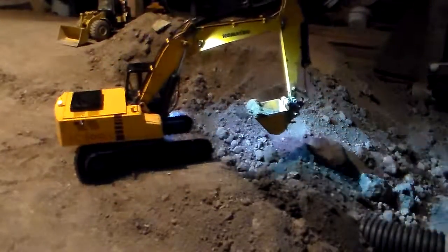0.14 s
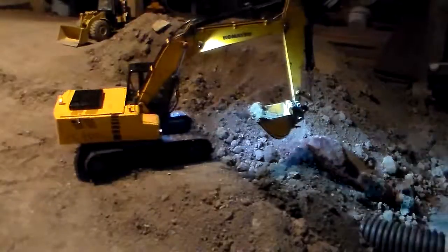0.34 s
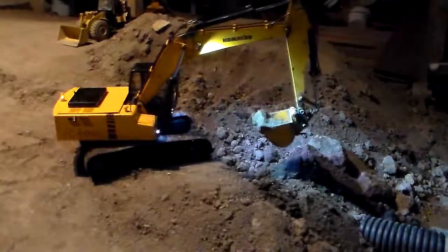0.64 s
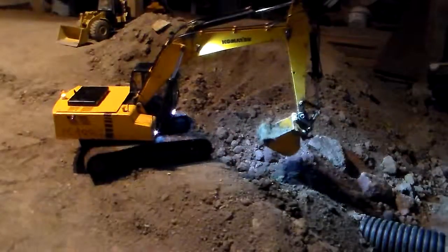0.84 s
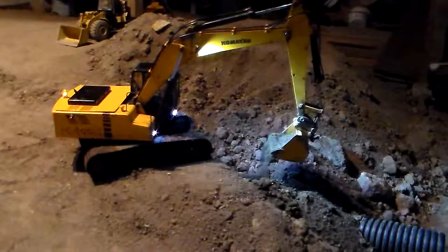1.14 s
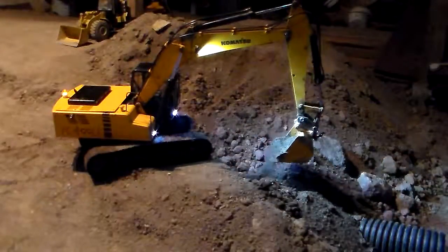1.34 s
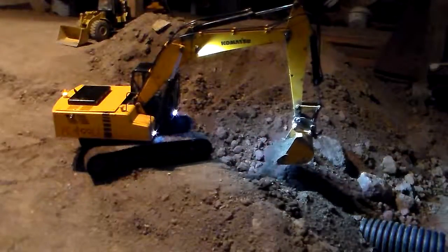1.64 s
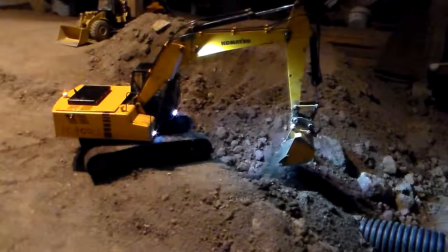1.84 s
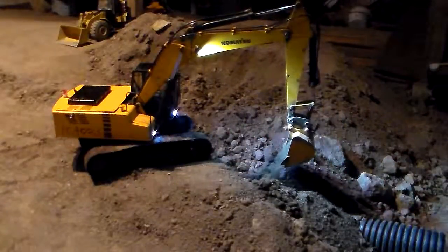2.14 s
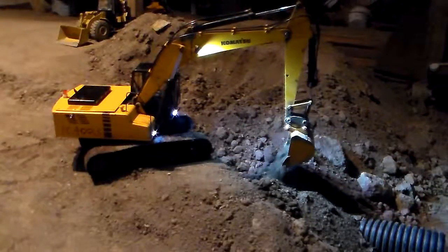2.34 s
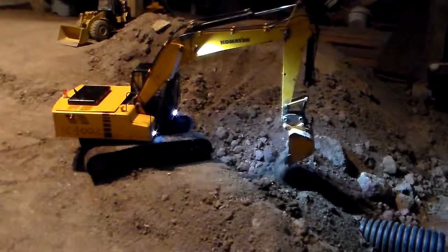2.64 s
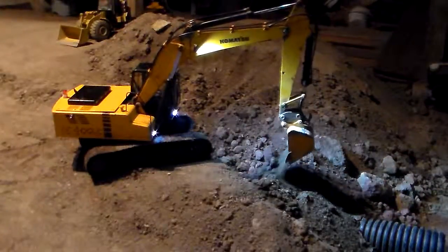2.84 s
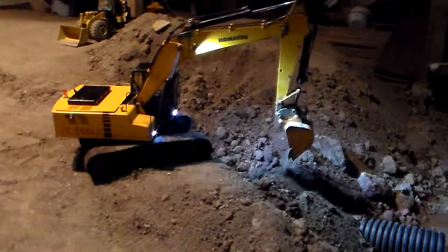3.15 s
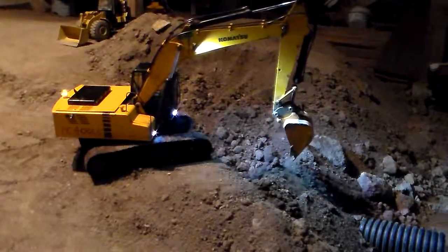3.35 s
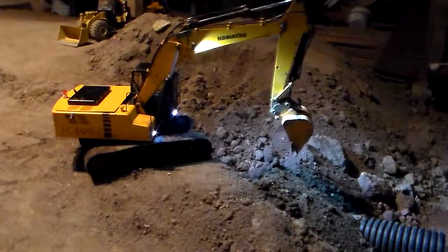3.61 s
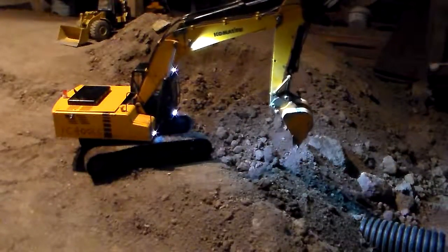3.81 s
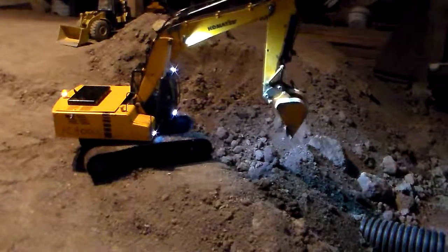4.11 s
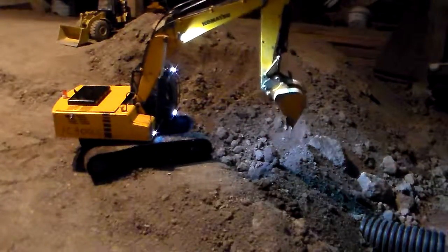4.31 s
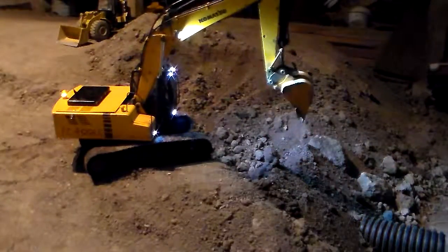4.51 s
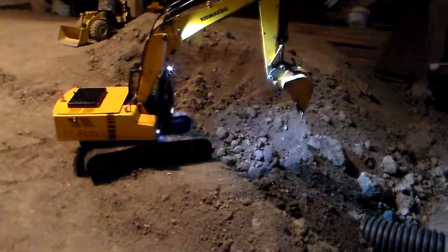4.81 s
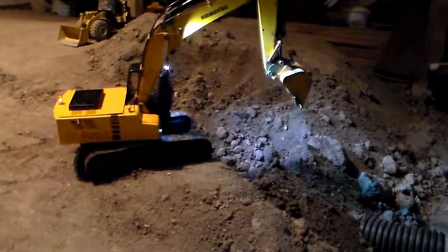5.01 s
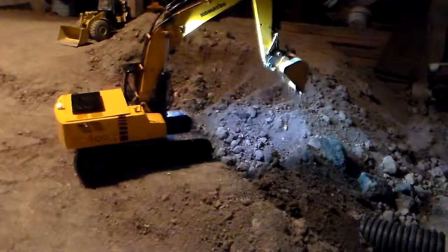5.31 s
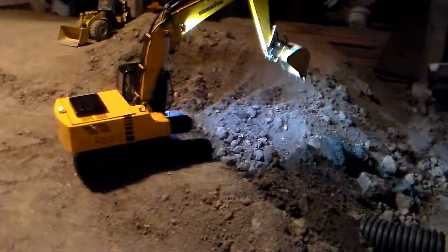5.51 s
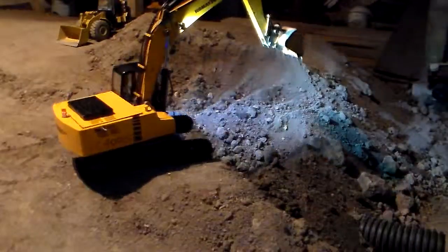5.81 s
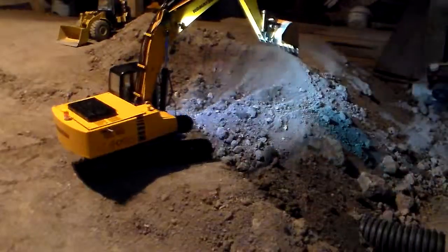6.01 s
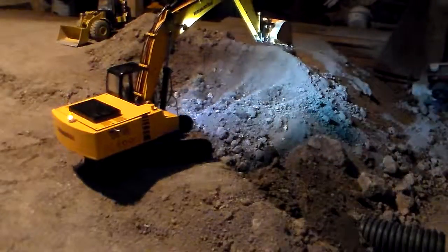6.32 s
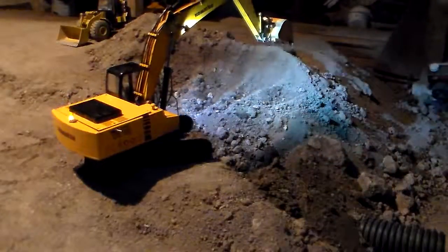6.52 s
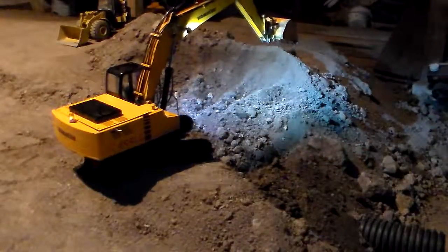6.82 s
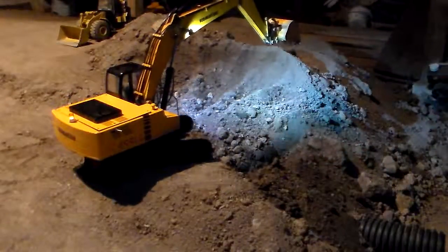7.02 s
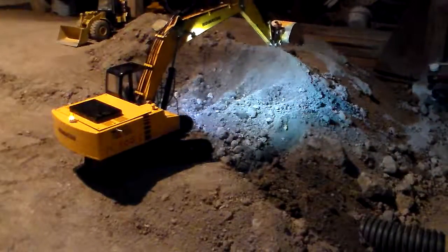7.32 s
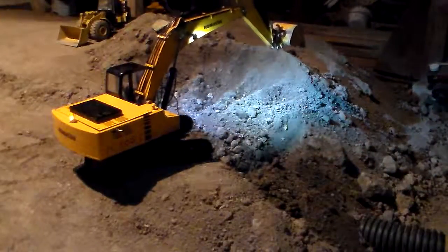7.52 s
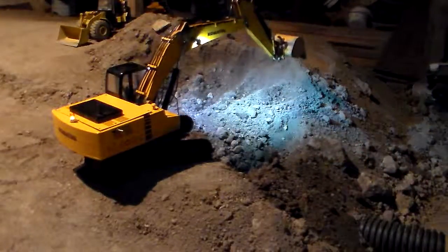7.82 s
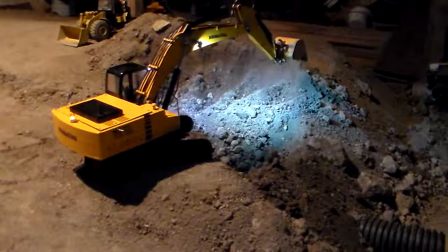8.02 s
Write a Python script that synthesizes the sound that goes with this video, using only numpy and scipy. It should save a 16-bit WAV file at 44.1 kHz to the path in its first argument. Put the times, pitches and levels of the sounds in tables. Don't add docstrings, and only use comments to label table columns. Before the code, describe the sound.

Steady shrill motor and gear whine of a model digger, close up, with slewing whirr, a single pebble click and brief whistling oil hisses.

```python
import sys
import numpy as np
from scipy import signal
from scipy.io import wavfile
from scipy.ndimage import uniform_filter1d

SR = 44100
rng = np.random.default_rng(int(sys.argv[2]) if len(sys.argv) > 2 else 0)


def inscribe(sig):
    pcm = np.round(np.clip(np.atleast_2d(sig).T, -1, 1) * 32767)
    wavfile.write(sys.argv[1], SR, pcm.astype(np.int16))


def volts_from_db(level):
    exponent = np.asarray(level, float) / 20
    return 10 ** exponent


N = 359415
T = np.arange(N) / SR
SLOW_T = T[::64]
NOISE_HZ = np.fft.rfftfreq(1024, 1 / SR)


def evened(x):
    return x / np.sqrt(np.mean(x ** 2) + 1e-20)


def read(points, hz):
    f, value = np.transpose(points)
    return np.interp(np.log(hz + 1), np.log(f + 1), value)


def smooth(x):
    return np.interp(T, SLOW_T, x)


def wander(top_hz, span=9):
    hz = np.geomspace(top_hz / span, top_hz, 12)[:, None]
    waves = np.sin(2 * np.pi * (hz * SLOW_T + rng.random(hz.shape)))
    return evened((waves / np.sqrt(hz)).sum(0))


# upper_mark_s, step_s
SWING = (5.4, 5.34)


def swung():
    return np.interp(SLOW_T, SWING, (0, 1))


# pitch_hz, width_hz, level_db
BODY = [(270, 4.4, 4), (386, 10, 5.5), (463.8, 12.5, 12), (579.7, 30.5, 9), (771, 31, 13.5), (910, 40, 0.5),
        (961.6, 28, 8), (1018, 34, 4.5), (1128.6, 76, 16.5), (2120, 83, 2.5), (3160, 480, 9.5),
        (4970, 170, 1), (6160, 200, 5.5), (9400, 90, 8.5)]


def body(hz):
    return 1 + sum((volts_from_db(db) - 1) / (1 + (2 * (hz - f) / width) ** 2) for f, width, db in BODY)


# start_s, settled_turns_per_s
LEVERS = [(0, 50.8), (.22, 49.95), (.45, 50.9), (.72, 51.6), (1.16, 53.72), (3.68, 52.2), (3.9, 54.69),
          (4.14, 55.37), (4.68, 51.0), (5.52, 53.3), (6.12, 55.8), (6.38, 54.37), (7.14, 55.04),
          (7.64, 56.92)]
# centre_s, change_turns_per_s (minus = cylinder binds, plus = it lets go)
SURGES = [(.5, .7), (.82, 1.2), (1.55, .7), (1.74, -1.12), (1.92, -1.75), (2.04, 1.08), (2.2, 1.3),
          (2.3, -1.19), (2.4, 1.23), (2.48, -1.47), (2.86, 1.2), (3.16, .88), (3.24, 1.93), (3.34, 1.38),
          (3.9, .75), (4.3, 1.53), (4.6, -1.72), (4.84, -1.4), (4.98, -.8), (5.22, .6), (5.34, -.8),
          (5.62, 1.15), (5.92, -.7), (6.74, 1.65), (6.9, -1.32), (6.98, 1.53), (7.22, -1.58), (7.78, .5)]


def shaft():
    settle_s, surge_s = 0.03, 0.035
    start_s, settled = np.transpose(LEVERS)
    speed = settled[0]
    for at, change in zip(start_s[1:], np.diff(settled)):
        speed = speed + change * (1 + np.tanh((SLOW_T - at) / settle_s)) / 2
    for at, change in SURGES:
        speed = speed + change * np.exp(-((SLOW_T - at) / surge_s) ** 2 / 2)
    flutter = 0.003 * wander(25)
    hunting = 0.0033 * wander(22, span=3)
    speed = speed * (1 + flutter + hunting)
    return speed, 2 * np.pi * np.cumsum(smooth(speed)) / SR


# speed_turns_per_s, gear_db, tooth_db, double_tooth_db, housing_db
RESPONSE = [(49.9, -42.5, -38, -38, -42), (51.33, -37.5, -35.5, -39, -44.5),
            (51.9, -37, -46.5, -42.5, -34.5), (52.94, -40.5, -34, -48, -37.5), (53.2, -41, -33, -44, -35.5),
            (55.74, -38.5, -34, -51.5, -34), (57, -45, -32.5, -44, -39), (55.1, -34, -35.5, -65, -42)]
# gear_db, tooth_db, double_tooth_db, housing_db
TURNED_DB = (-1.5, 4, 2.5, .5)


def whines_db(speed):
    turns, *levels_db = np.transpose(RESPONSE)
    turned = swung()
    return [np.interp(speed, turns, c) + gain_db * turned for c, gain_db in zip(levels_db, TURNED_DB)]


# shaft_multiple, level_db
WHINES = [
    [(18, -7.5), (18.5, 6.5), (19, -6)],
    [(20, -3), (20.5, -6), (21, 13), (21.5, -12)],
    [(41.5, 0.5), (42, 3), (42.5, -7)],
]
# shaft_multiple, rms_db
LOW = [(5, -71), (6, -71.5), (7, -65), (8.5, -58.5), (9, -58.5), (10, -54.5), (10.5, -47), (11, -48),
       (11.5, -54.5), (13, -55), (14, -57), (14.5, -52), (15.5, -51)]


def gears(speed, angle):
    *levels_db, case_db = whines_db(speed)
    out = housing(angle, case_db) / np.sqrt(2) + whirr(angle)
    for orders, level_db in zip(WHINES, levels_db):
        shares = np.array([volts_from_db(db + 2.4 * wander(12)) * body(k * speed) ** 2.5 for k, db in orders])
        shares *= volts_from_db(level_db) / np.linalg.norm(shares, axis=0)
        for (k, _), share in zip(orders, shares):
            slip = k / 28 * wander(30)
            out += smooth(share * volts_from_db(1.48 * wander(22))) * np.cos(k * angle + smooth(slip))
    for k, db in LOW:
        bared_db = 4.7 * (k * speed < 350) * swung()
        ring = evened(body(k * speed) ** 1.27) * volts_from_db(bared_db)
        level = smooth(volts_from_db(db + 1.8 * wander(14)) * ring)
        out += level * np.cos(k * angle + smooth(0.97 * wander(12)))
    lag = np.roll(out, 1)
    return np.sqrt(2) * np.array([out, 0.55 * out + 0.53 * lag])


# shaft_multiple, level_db
KNOCKS = [(47, 0), (48, -6), (49, 3), (50, -9), (51, -9)]
# pitch_hz, width_hz, level_db
HOUSING = [(2515, 32, 0), (2589, 18.5, 12), (2694, 29, 6.5), (2744, 74, -4.5)]


def housing(angle, level_db):
    drive = sum(volts_from_db(db) * np.cos(k * angle + smooth(wander(30))) for k, db in KNOCKS)
    drive = drive + 0.9 * rng.standard_normal(N)
    ring = 0
    for hz, width, db in HOUSING:
        ring = ring + volts_from_db(db) * signal.lfilter(*signal.iirpeak(hz, hz / width, SR), drive)
    power = uniform_filter1d(uniform_filter1d(ring ** 2, size=4000), size=4000)
    return smooth(volts_from_db(level_db + 1.6 * wander(9))) * ring / np.sqrt(power)


# before_swing_rms_db, after_swing_rms_db
WHIRR_DB = (-57, -54.5)


def whirr(angle):
    level_db = np.interp(SLOW_T, SWING, WHIRR_DB)
    out = 0
    for k in np.arange(22, 33, 0.5):
        level = smooth(volts_from_db(level_db + 4.5 * wander(5.5)))
        out = out + level * np.cos(k * angle + 2 * np.pi * rng.random())
    return out


# time_s, upper_left_db, upper_right_db, lower_left_db,
# lower_right_db, carrier_db, fading_depth_db
WINDINGS = [(0.1, -43.5, -51, -54, -45.5, -54, 1.5), (.85, -40.5, -45, -49, -44.5, -53, 1),
            (1.2, -37.5, -38, -46, -45.5, -65, 0.2), (3.6, -36.5, -40, -46.5, -43.5, -59, -0.9),
            (4.502, -37.5, -43, -46, -43.5, -63, -2.3), (5.0, -39.5, -41, -46, -44.5, -52, 0),
            (5.35, -44.5, -48, -51, -47, -59, 0.5), (5.85, -39, -48, -46, -49, -59, -1.5),
            (6.1, -43, -48.5, -47, -50, -52, 3.5), (6.35, -37, -53, -54, -47.5, -61, 4),
            (7.4, -36.5, -38.5, -49, -46, -55, 0.5), (8.1, -37, -42, -49, -39.5, -69, 2)]
# shaft_multiple, before_swing_db, after_swing_db
SIDEBANDS = [(-14, -19.4, -18.0), (-9, -15.9, -15.6), (-8, -6.1, -6.6), (-7, 0.0, 0.0), (-5, -4.1, -2.7),
             (-4, -15.1, -17.9), (-2, -18.0, -14.1), (-1, -16.8, -15.5), (-0.5, -21.7, -15.3),
             (0.5, -26.3, -22.1), (1, -24.9, -27.2), (2, -21.4, -15.6), (3, -26.7, -28.9),
             (3.5, -21.3, -26.5), (4, -18.1, -14.8), (5, -10.1, -14.3), (6.5, -16.0, -20.1), (7, 0.0, 0.0),
             (8, -14.8, -15.2), (9, -13.9, -9.3), (11, -21.1, -20.2), (13, -26.9, -26.2),
             (14, -22.8, -24.6)]
# upper_pole_db, lower_pole_db
POLE_DB_PER_TURN = (-0.88, -0.48)


def controller(speed, angle):
    switch_hz = 8017
    time_s, *levels_db = np.transpose(WINDINGS)
    *poles_db, carrier_db, fade_db = (np.interp(SLOW_T, time_s, c) for c in levels_db)
    up, low = (slope_db * (speed - 54) for slope_db in POLE_DB_PER_TURN)
    up_l, up_r, low_l, low_r = (
        c + slide + fade_db * wander(14, span=6) for c, slide in zip(poles_db, (up, up, low, low)))
    carrier_db = carrier_db + fade_db * wander(14, span=6)
    turned = swung()
    carrier = 2 * np.pi * switch_hz * T
    rotor = angle + smooth(0.075 * wander(32))
    out = np.tile(smooth(volts_from_db(carrier_db)) * np.cos(carrier), (2, 1))
    for k, before_db, after_db in SIDEBANDS:
        base_db = before_db + turned * (after_db - before_db)
        base_db = base_db + (1.75 + 0.53 * turned) * wander(16)
        drift = smooth(0.5 + 1.2 * wander(1.8)) / 2
        tone = carrier + k * rotor + 2 * np.pi * rng.random()
        for ch, side_db in enumerate((up_l, up_r) if k > 0 else (low_l, low_r)):
            level = smooth(volts_from_db(base_db + side_db + 0.6 * wander(11)))
            out[ch] += level * np.cos(tone + (-1) ** ch * drift)
    return np.sqrt(2) * out


# pitch_hz, likeness (0 to 1)
SAME = [(60, 0.61), (130, 0.15), (290, 0.53), (620, 0.9), (1360, 1), (2980, 0.9), (6500, 0.62),
        (14200, 0.66)]
# pitch_hz, lead_rad
LEAD = [(0, 0.17), (6200, 0), (9000, 0.46), (14400, 0)]
# pitch_hz, level_db
TILT = [(60, 0.5), (180, 0.0), (530, -1), (1590, 0), (4760, -1.5), (14200, 1)]


def noise(colour, patchy_db):
    shape = (N // 256 + 5, 513)
    a, b, c, d, patches = rng.standard_normal(shape + (5,)).T
    patches = evened(uniform_filter1d(uniform_filter1d(patches, size=8, axis=0), size=14, axis=1))
    streaks = rng.standard_normal(shape).T
    streaks = uniform_filter1d(uniform_filter1d(streaks, size=2, axis=0), size=160, axis=1)
    patches = patches + 1.77 * evened(streaks)
    same = np.clip(read(SAME, NOISE_HZ), -1, 1)[:, None]
    left = a + 1j * b
    right = same * left + np.sqrt(1 - same ** 2) * (c + 1j * d)
    right = right * np.exp(-1j * read(LEAD, NOISE_HZ))[:, None]
    tilt = volts_from_db(read(TILT, NOISE_HZ) / 2)[:, None]
    z = np.array([left * tilt, right / tilt]) * colour[:, None] * volts_from_db(patchy_db * patches)
    return evened(signal.istft(z, nperseg=1024, noverlap=768)[1][:, :N])


# pitch_hz, density_db (per Hz)
ROAR = [(20, -15.5), (62, -8.5), (85, -16.5), (200, -22), (380, -24.5), (520, -13.5), (900, -11.5),
        (1300, -5.5), (1800, -10), (2000, -14), (2600, -4), (3100, -18.5), (5000, -17.5), (7000, -23.5),
        (9000, -23), (14500, -32)]
# time_s, level_db
ROAR_DB = [(0.0, -40), (0.09, -38), (1.66, -38.5), (8.06, -38.5), (8.15, -37)]


def roar(angle):
    time_s, level_db = np.transpose(ROAR_DB)
    throb = 1 + 0.068 * np.cos(angle) + 0.12 * np.cos(angle / 2)
    wide = noise(volts_from_db(read(ROAR, NOISE_HZ)) * body(NOISE_HZ) ** 0.77, patchy_db=1.09)
    return volts_from_db(np.interp(T, time_s, level_db) + 5) * throb * wide


# time_s, rms_db
SLEW = [
    (0, -42.5),
    (.7, -39),
    (1.1, -48),
    (4.6, -47.5),
    (4.85, -38.5),
    (5.5, -38.5),
    (6.1, -45.5),
    (6.5, -86),
]
# pitch_hz, density_db (per Hz)
SLEW_COLOUR = [(1200, -25), (1550, -9), (1750, 7.5), (1950, 0), (2900, -17.5), (3500, -3.5), (4500, -14.5),
               (14500, -24)]


def slewing():
    time_s, level_db = np.transpose(SLEW)
    return volts_from_db(np.interp(T, time_s, level_db)) * noise(volts_from_db(read(SLEW_COLOUR, NOISE_HZ)), patchy_db=0.5)


# start_s, length_s, level_db, whistle_start_hz, whistle_end_hz
VALVES = [
    (3.17, .12, -52, 5460, 5470),
    (3.86, .2, -45.5, 6200, 6300),
    (4.198, 0.23, -46, 5607, 5700),
    (4.36, 0.24, -42.5, 6100, 6150),
    (4.595, .22, -41.5, 5274, 5620),
    (4.85, 0.1, -49, 5500, 5580),
    (5, .18, -43.5, 5760, 5890),
]
# pitch_hz, density_db (per Hz)
JET = [(2000, -33), (3500, -2), (6000, 9), (7500, 0), (9500, 2.5), (14500, -10)]


def valves():
    jet = noise(volts_from_db(read(JET, NOISE_HZ)), patchy_db=2.6)
    fuzz = evened(uniform_filter1d(rng.standard_normal(N), size=400))
    out = np.zeros((2, N))
    for start_s, length_s, db, from_hz, to_hz in VALVES:
        part = slice(round(start_s * SR), round((start_s + length_s) * SR))
        hz = np.linspace(from_hz, to_hz, len(fuzz[part]))
        whistle = fuzz[part] * np.cos(2 * np.pi * np.cumsum(hz) / SR)
        opening = signal.windows.tukey(len(hz), 0.6)
        out[:, part] += volts_from_db(db) * (jet[:, part] + 0.6 * whistle) * opening
    return out


STONE_S, STONE_PEAK_DB = 1.6895, -13.5
# pitch_hz, level_db, t60_s
STONE_MODES = [(3270, 3.5, 0.0065), (3683, 2, 0.0044), (4200, -12, 0.0035), (6800, -6, 0.0046),
               (10700, -10, 0.0071), (13500, -24, .004)]


def stone():
    t = np.maximum(T - STONE_S, 0)
    ring = sum(volts_from_db(db - 60 * t / t60) * np.sin(2 * np.pi * hz * t) for hz, db, t60 in STONE_MODES)
    return volts_from_db(STONE_PEAK_DB) * ring * (1 - np.exp(-t / 0.00042))


def building_hum():
    return np.sqrt(2) * smooth(volts_from_db(-52.5 + wander(13))) * np.cos(2 * np.pi * 30 * T)


def scene():
    speed, angle = shaft()
    machine = gears(speed, angle) + controller(speed, angle) + roar(angle)
    return machine + slewing() + valves() + stone() + building_hum()


def low_pass(x):
    return signal.sosfilt(signal.butter(12, 14280, fs=SR, output="sos"), x)


def record(dry):
    since = T - STONE_S - 0.004
    duck_db = np.where(since > 0, -3.5 * np.exp(-np.maximum(since, 0) / 0.43), 0)
    return low_pass(dry * volts_from_db(duck_db))


dry = scene()
out = record(dry)
inscribe(out)
```